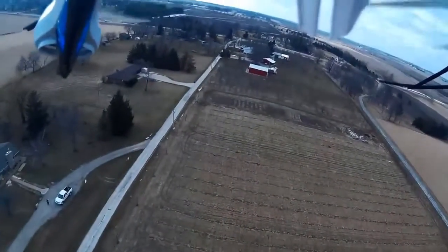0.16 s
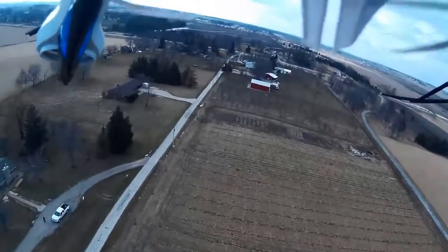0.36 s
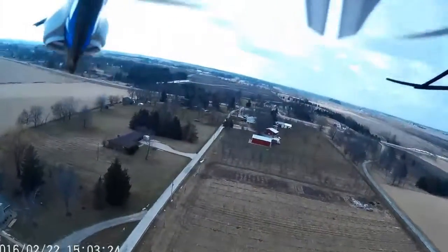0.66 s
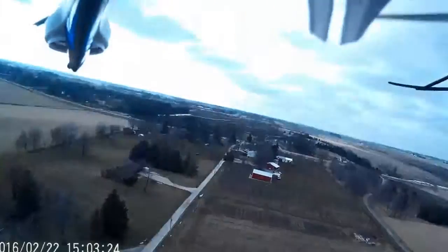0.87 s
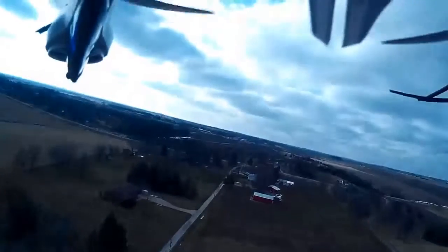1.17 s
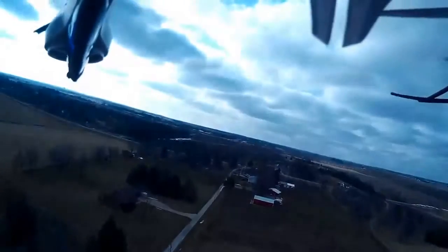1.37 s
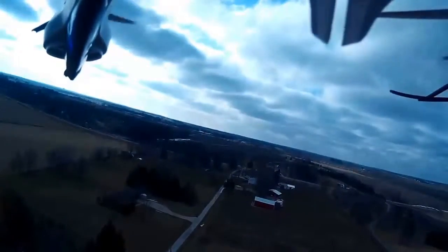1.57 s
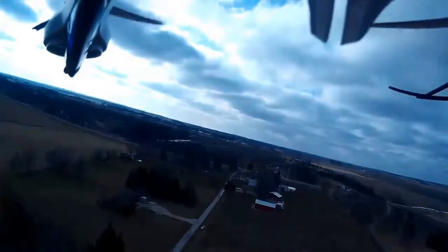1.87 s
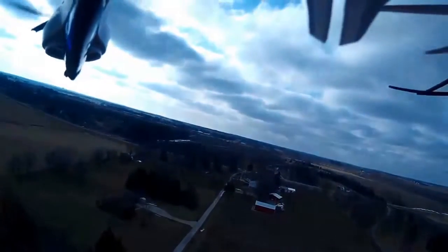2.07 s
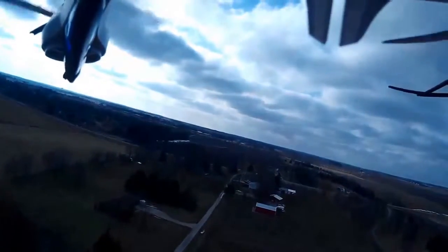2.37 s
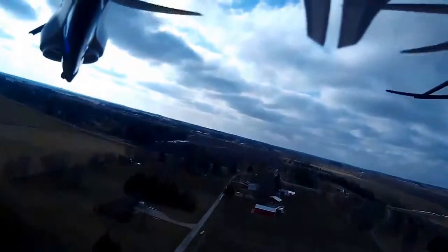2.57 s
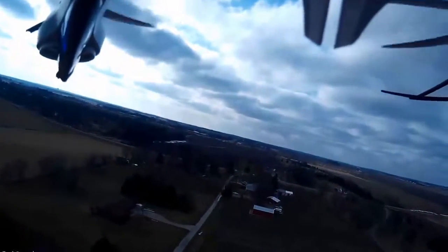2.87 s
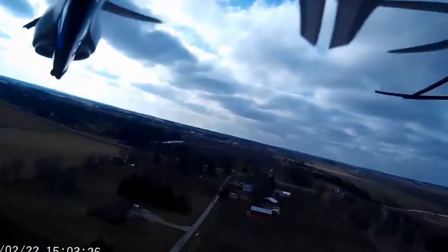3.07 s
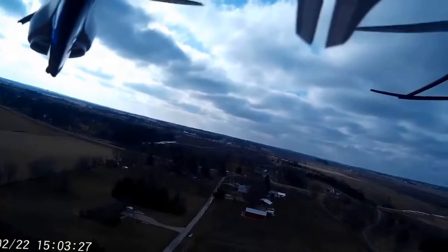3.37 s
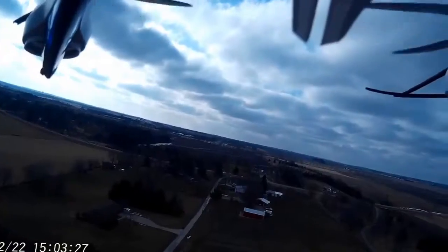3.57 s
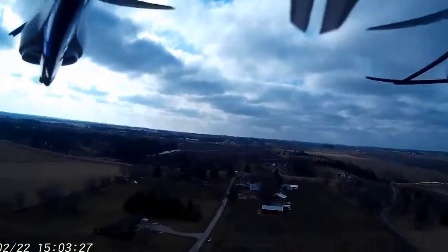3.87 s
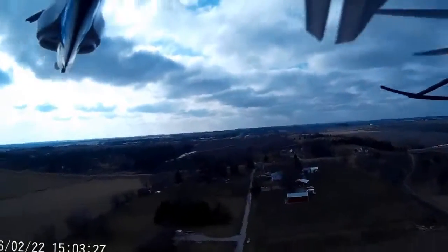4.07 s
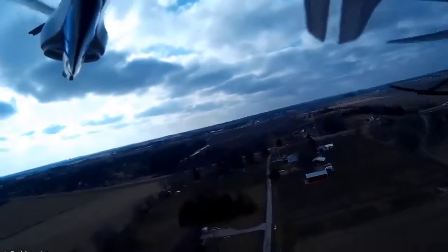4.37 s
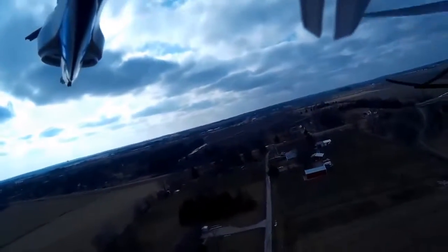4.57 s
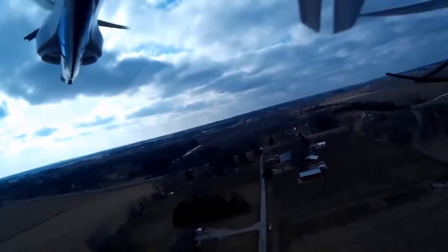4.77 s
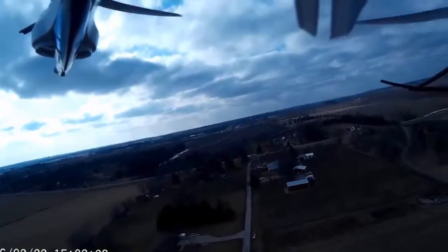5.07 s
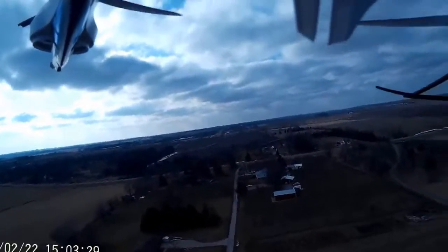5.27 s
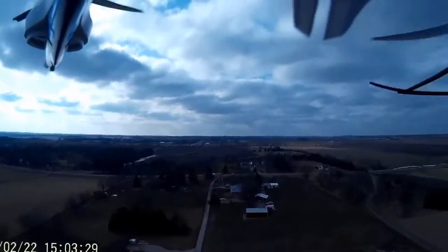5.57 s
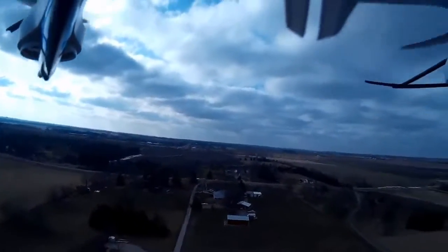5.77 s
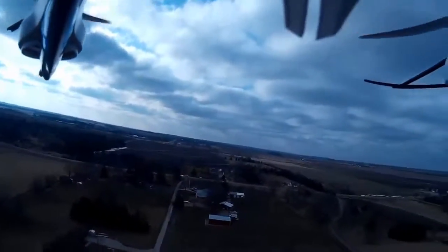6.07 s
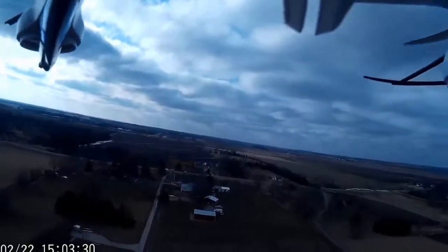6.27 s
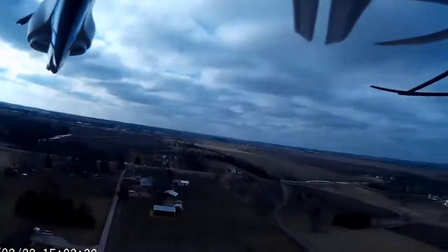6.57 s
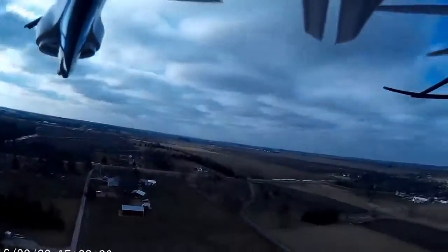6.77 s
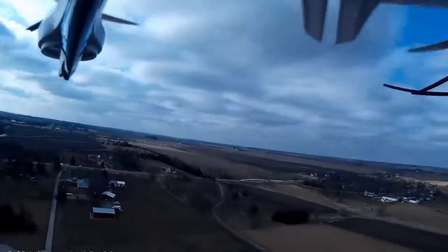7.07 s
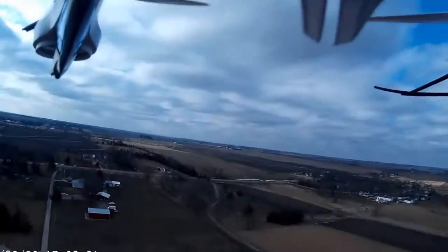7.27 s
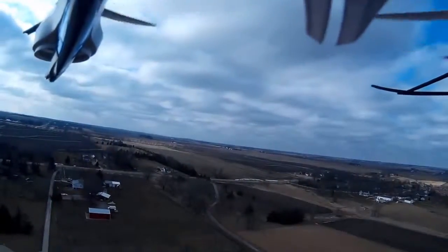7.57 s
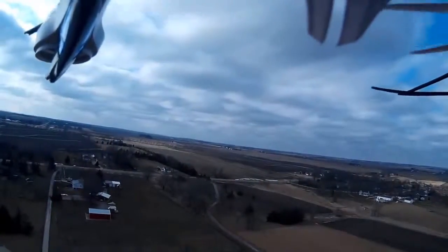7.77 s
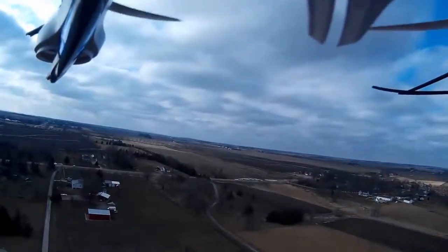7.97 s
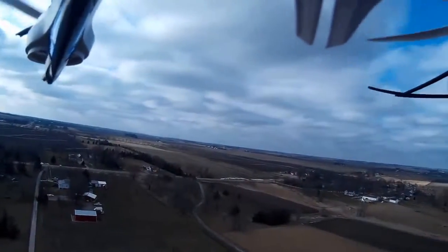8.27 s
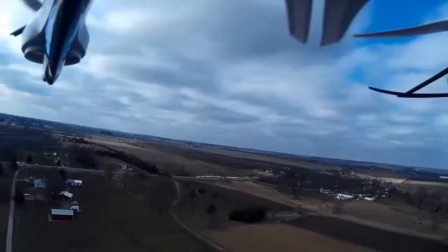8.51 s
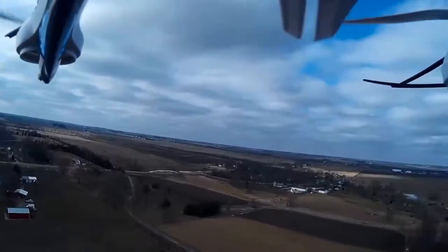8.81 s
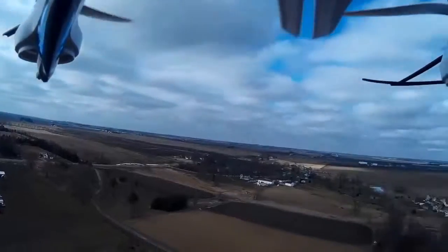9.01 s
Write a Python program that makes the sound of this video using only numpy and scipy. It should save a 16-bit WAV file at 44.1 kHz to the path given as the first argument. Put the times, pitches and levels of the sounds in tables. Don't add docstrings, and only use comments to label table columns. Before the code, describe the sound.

A small quadcopter is already flying, heard dry and very close through a microphone on its plastic frame. From 0 s four brushed motors make a dense, nasal whine, mostly in the mid range, each pitch wavering separately so they beat and clash. Beneath is low two-blade propeller hum; above are gear whine, gritty hiss and soft, irregular rattling. Wind buffets in low lumps until about 2 s, eases by 3 to 4 s, and leaves the motors clearer as their pitches keep sliding. A short gust thumps near 6 s. From about 6.5 s the motor pairs trade speed: quick pitch steps at 6.5, 7 and 7.2 s, then another drop near 8.1 s. Propeller rush swells and dips. A thin, fixed high electronic tone grows faintly towards the end around 9 s, with the motors still running.

```python
import sys
import numpy as np
from scipy import signal
from scipy.fft import rfft, irfft
from scipy.io import wavfile

SR = 44100
rng = np.random.default_rng(int(sys.argv[2]) if len(sys.argv) > 2 else 0)


def nominal_scale(level):
    x = np.asarray(level, float) / 20
    return 10 ** x


def output_pcm(signal):
    pcm = np.clip(np.atleast_2d(signal).T, -1, 1) * 32767
    wavfile.write(sys.argv[1], SR, np.round(pcm).astype(np.int16))


N = 403206
HOP = 40


def rms_one(x):
    return x / np.sqrt(np.mean(x ** 2) + 1e-20)


def in_time(rows):
    s, *columns = np.transpose(rows)
    return [np.interp(np.arange(N) / SR, s, column) for column in columns]


def at_hz(points, hz):
    points = np.array(points)
    return np.interp(np.log(hz), np.log(points[:, 0]), points[:, 1])


def slow_chance(rate):
    r = np.exp(-2 * HOP * np.pi * rate / SR)
    settle = 2000
    noise = rng.standard_normal(N // HOP + settle + 2)
    return rms_one(signal.lfilter([1], [1, -2 * r, r * r], noise)[settle:])


def to_samples(slow):
    return np.interp(np.arange(N) / HOP, np.arange(len(slow)), slow)


def drift(rate):
    return to_samples(slow_chance(rate))


def coloured_noise(points, band):
    hz = np.arange(N // 2 + 1) * SR / N + 1e-3
    gain = nominal_scale(at_hz(points, hz))
    counted = gain[(hz > band[0]) & (hz < band[1])]
    noise = irfft(rfft(rng.standard_normal(N)) * gain, N)
    return noise / np.sqrt(np.sum(counted ** 2) / len(hz))


def tone(turns, order, level_db, flicker_db):
    start = rng.random()
    gain = nominal_scale(level_db + flicker_db * slow_chance(3.6)[:len(level_db)])
    return np.sqrt(2) * to_samples(gain) * np.sin(2 * np.pi * (order * turns + start))


# t/s, shaft speed f/Hz, shaft wobble level/dB, brush whine level/dB
MOTOR_1 = [(0, 767.7, -25, -25.5), (.5, 753, -24, -26.5), (.93, 800, -20.5, -25), (1.29, 773, -22.5, -25),
           (1.83, 748.5, -26, -24), (2.11, 760, -20.5, -21.5), (2.31, 729.8, -26.5, -25),
           (5.7, 731.3, -26.5, -24.5), (5.86, 749.6, -24, -25.5), (6.18, 754.6, -22.5, -23),
           (6.42, 728.6, -24, -24), (6.54, 727, -25, -23), (6.8, 670.6, -25, -25), (7.4, 668, -28, -25),
           (7.72, 691.6, -21.5, -22.5), (8.12, 648.2, -24, -21.5), (8.6, 598.7, -22, -24),
           (9.15, 588.5, -32, -25)]
MOTOR_2 = [(0, 696, -26, -30), (.22, 739, -25, -29.5), (.9, 739.2, -31.5, -36), (1.4, 722, -24, -28),
           (1.86, 716.7, -22, -27), (2.66, 690.8, -20.5, -26.5), (3.6, 684.2, -21.5, -29),
           (3.75, 663, -21, -25), (4.87, 666.3, -20, -24), (5.3, 649.3, -20.5, -23), (5.88, 612, -21, -21),
           (6.19, 613.6, -19.5, -23.5), (6.7, 624, -27.5, -18), (6.99, 668, -18.5, -23),
           (7.81, 668.7, -21, -20), (8.1, 655, -20.5, -18.5), (8.561, 655.8, -39, -19.5),
           (9.15, 617, -27, -16.5)]
MOTOR_3 = [(0, 592.6, -30.5, -27.5), (.87, 610.3, -30.5, -27.5), (1.34, 640.8, -30, -26.5),
           (1.9, 672.5, -27.5, -29), (2.14, 657, -29.5, -29), (2.41, 660, -27, -24),
           (2.7, 688.5, -27, -25.5), (3.36, 719.3, -32, -26.5), (3.62, 720, -25, -28),
           (4.22, 772, -37, -29), (4.6, 739.7, -37, -40), (4.8, 689.2, -37.5, -28.5), (5.45, 644, -29, -22),
           (5.65, 612, -26, -24), (6.57, 660, -28.5, -25), (7.0, 603, -31, -23.5), (7.69, 659.7, -33, -25),
           (9.15, 593.2, -25.5, -21.5)]
MOTOR_4 = [(0, 597, -34, -33), (.59, 567, -26, -30), (.81, 529, -43, -48), (2.06, 530, -34, -27),
           (2.26, 567, -27.5, -33), (2.89, 559, -31.5, -29), (3.26, 523, -34, -27), (3.48, 544, -31, -29.5),
           (3.89, 547, -30.5, -31), (4.21, 505, -47, -27), (4.51, 534, -40, -30), (4.771, 581, -29, -32.5),
           (5.27, 599, -26.5, -41), (6.25, 597, -25.5, -46), (6.62, 568, -27, -19.5),
           (7.1, 613, -30, -28.5), (8.6, 608, -25, -33.5), (9.15, 570, -23, -27)]
MOTORS = [MOTOR_1, MOTOR_2, MOTOR_3, MOTOR_4]
# start t/s, length t/s, lasting step of motors 1 and 3 f/Hz, of motors 2 and 4 f/Hz
YAW = [
    (6.45, .14, 15, -60),
    (7.0, .08, -45, 55),
    (7.19, .2, 58, -52),
    (8.11, .18, 9, -59),
]
# middle t/s, step f/Hz, half length t/s
TRIMS = [
    [(.2, -7, 0.13), (.37, 8, 0.1), (.73, -11, .11), (1.44, 8, .14), (2.07, 6, 0.0997), (3.19, 15, .3),
     (3.55, -14, .22), (4.01, 27, 0.28), (4.62, 17, .26), (5.12, 15, .23), (6.04, -8, 0.16),
     (8.27, 10, .15)],
    [(.49, -10, .25), (2.46, 11, 0.19), (3.1, -11, 0.23), (3.97, -14, .18), (4.62, -22, .24),
     (5.43, -10, 0.12), (5.68, 8, 0.16), (6.36, 14, .17), (8.72, -7, .13), (8.95, 7, .11)],
    [(.46, 22, 0.28), (5.72, 12, 0.0976), (5.95, -16, .17), (8.9, -17, 0.24)],
    [(7.12, 15, .11), (7.47, -12, .14), (7.7, 8, .3), (8.9, 9, .2)],
]


def speed(arm):
    s = np.arange(N) / SR
    hz = in_time(MOTORS[arm])[0]
    for start, length, *pairs in YAW:
        hz = hz + pairs[arm % 2] * np.clip((s - start) / length, 0, 1)
    for middle, step, half in TRIMS[arm]:
        hz = hz + step * np.clip(1 - abs(s - middle) / half, 0, 1)
    return hz


# f/Hz, level/dB
SHELL = [(420, -15.5), (690, 0.5), (1000, -16), (1250, -5), (1600, -11), (1950, -15), (2300, -10),
         (2650, -20), (3150, -28.5), (3800, -22.5), (4600, -26.5), (6300, -39), (7200, -35.5), (9000, -48)]
# f/Hz, width f/Hz, level/dB
FRAME = [
    (668, 24, 3.5),
    (1483, 27, 6),
    (1880, 27, 1),
    (2683.4, 50, 6),
]


def body_db(hz):
    return at_hz(SHELL, hz) + sum(db / (1 + ((hz - top) / width) ** 2) for top, width, db in FRAME)


PROPELLER_TURNS = .09165
# propeller orders away, level/dB
RUN_OUT = [(-1, -25), (1, -14.5), (2, -15)]


def shaft_tone(turns, level_db):
    out = tone(turns, 1, level_db, flicker_db=.8)
    for away, db in RUN_OUT:
        out += tone(turns, 1 + round(away) * PROPELLER_TURNS, level_db + db, flicker_db=-0.5)
    return out


WHINE_ORDERS = [3, 2, 4, 5, 6]
# whine orders 2, 4, 5, 6 re the third level/dB, then mesh orders 7, 8, 10, 12 re the ninth level/dB
WHINE_DB = [
    [-6, -13.5, -5.5, -1, -13, -5.5, -8, -6],
    [-5, -6, -10, -14.5, -4.5, 0, -0.5, -7],
    [-5, -14.5, -7, -2, -6.5, -5, -14, -6],
    [-6.5, -1, -15, -7.5, -10, -8.5, -6, -11],
]


def brush_whine(arm, turns, hz, level_db):
    out = 0
    for order, db in zip(WHINE_ORDERS, [0] + list(WHINE_DB[arm][:4])):
        out = out + tone(turns, order, level_db + db + body_db(order * hz), flicker_db=1.2)
    return out


MESH_ORDERS = [9, 7, 8, 10, 12]
# propeller orders away, level/dB
MESH_SIDES = [(2, -3), (-2, -9)]
# f/Hz, level/dB
GEAR_CASE = [(4400, -5), (4750, -6), (5050, 4), (5350, 0), (6100, 3), (6550, -1), (6900, 1), (7200, 0)]
MESH_DB = [-33, -37, -27.5, -24.5]
# growth of mesh level with speed, dB/Hz
MESH_DB_PER_HZ = [.3, 0, .04, 0]
# growth of mesh level as gears warm, dB/s
MESH_DB_PER_S = [-.5, .8, .5, .5]
MESH_SWING_DB = [0, -12, -14, -14]


def gear_mesh(arm, turns, hz, load_db):
    from_middle_s = (np.arange(0, N, HOP) - N / 2) / SR
    by_speed = np.clip(MESH_DB_PER_HZ[arm] * (hz - hz.mean()), -7, 7)
    level_db = MESH_DB[arm] + MESH_DB_PER_S[arm] * from_middle_s + by_speed + load_db
    level_db = level_db + at_hz(GEAR_CASE, 9 * hz)
    out = 0
    for order, db in zip(MESH_ORDERS, [0] + list(WHINE_DB[arm][4:])):
        out = out + tone(turns, order, level_db + db + body_db(order * hz), flicker_db=1.6)
    for away, db in MESH_SIDES:
        side_db = level_db + MESH_SWING_DB[arm] + db + body_db(9 * hz)
        out += tone(turns, 9 + round(away) * PROPELLER_TURNS, side_db, flicker_db=4)
    return out


# propeller order, level/dB re the blade hum
PROPELLER = [(1, -24.5), (2, -0.5), (3, -15), (4, -13.5), (6, -28.5)]


def propeller_hum(turns, level_db):
    out = 0
    for order, db in PROPELLER:
        out = out + tone(turns, round(order) * PROPELLER_TURNS, level_db + db, flicker_db=.5 + 0.43 * order)
    return out


def rotor(arm, hz, blade_db, load_db):
    unsteady = 1 + .0006 * drift(26.1) + .001 * drift(5.0)
    turns = np.cumsum(hz * unsteady) / SR
    shaft_db, whine_db = in_time(MOTORS[arm])[1:]
    hz, shaft_db, whine_db, blade_db, load_db = np.array([hz, shaft_db, whine_db, blade_db, load_db])[:, ::HOP]
    out = shaft_tone(turns, shaft_db + body_db(hz))
    out += brush_whine(arm, turns, hz, whine_db + load_db)
    out += gear_mesh(arm, turns, hz, load_db)
    return out + propeller_hum(turns, blade_db)


# f/Hz, level/dB per Hz
WIND = [(15, -28), (34, 4), (55, 7.5), (100, 0.5), (200, -0.5), (320, -11.5), (600, -56.5), (1500, -88)]


def wind(level_db):
    return nominal_scale(level_db + 1.14 * drift(6.5)) * coloured_noise(WIND, (20, 75))


# f/Hz, level/dB per Hz
DOWNWASH = [(90, -18.5), (200, -2.5), (420, -4.5), (690, 0.5), (1000, 0), (1850, -9), (2300, -8.5),
            (3150, -27), (6000, -64)]


def downwash(level_db):
    return nominal_scale(level_db + 0.37 * drift(11.0)) * coloured_noise(DOWNWASH, (850, 1150))


# f/Hz, level/dB per Hz
HISS = [(2000, 1), (3150, 11.5), (3900, 22), (4700, 17), (6300, 4), (7200, 9), (9000, -2), (11500, 3),
        (12800, -10.5), (15500, -15.5)]


def hiss(level_db, hz):
    blades = 2 * PROPELLER_TURNS * np.cumsum(hz) / SR
    throb_db = np.sin(2 * np.pi * blades)
    return nominal_scale(level_db + 0.43 * drift(25) + throb_db) * coloured_noise(HISS, (7500, 12000))


# f/Hz, width f/Hz, level/dB
RATTLE = [
    (3680, 270, -1),
    (4430, 240, 2),
    (4970, 2200, -15),
]


def rattle(level_db):
    per_s, spread_db, soft_hz = 110, 5, 5500
    born = rng.random(N) < per_s * nominal_scale(7.0 * drift(14)) / SR
    strength = nominal_scale(spread_db * np.minimum(rng.exponential(1, N), 3))
    ticks = born * strength * rng.choice([-1, 1], N) + 1e-18
    ticks = signal.sosfilt(signal.butter(6, soft_hz, fs=SR, output="sos"), ticks)
    out = 0
    for k, (hz, width, db) in enumerate(RATTLE):
        r = np.exp(-np.pi * width / SR)
        poles = [1, -2 * r * np.cos(2 * np.pi * hz / SR), r * r]
        out = out + (-1) ** k * nominal_scale(db) * signal.lfilter([1 - r, 0, r - 1], poles, ticks)
    ringing = signal.sosfilt(signal.butter(3, 2800, "high", fs=SR, output="sos"), out)
    return nominal_scale(level_db - 10.5) * rms_one(ringing)


def switching():
    s = np.arange(N) / SR
    return tone(3670.2 * s, 1, level_db=-54.5 + 0.93 * s[::HOP], flicker_db=2.0)


# t/s, wind on the port level/dB, downwash level/dB, blade hum of the nearest propeller level/dB
AIR = [(0, -28, -33, -26), (.38, -25.5, -29.5, -19.5), (1.35, -26, -30.5, -22), (1.95, -28, -30, -21),
       (2.47, -32, -30, -21.5), (2.77, -30.5, -33, -25.5), (3.59, -35, -33, -28.5),
       (4.1, -38.5, -33.5, -26), (5.01, -37.5, -34, -27), (5.88, -38.5, -31, -22.5),
       (5.97, -28.5, -32, -22.5), (6.1, -37, -30, -24), (6.69, -37.5, -31, -23), (7.05, -38.5, -29, -25),
       (7.22, -42.5, -34.5, -28.5), (7.55, -38, -30.5, -21.5), (8.35, -40, -29.5, -30),
       (9.14, -43, -27.5, -22)]
# level/dB in mean wind, share of the wind's swing
FAR_BLADES = [
    (-32, 0.72),
    (-35.5, 0.092),
    (-34, 0.56),
]


def scene():
    wind_db, downwash_db, near_db = in_time(AIR)
    gust = wind_db - wind_db.mean()
    load = downwash_db - downwash_db.mean()
    blades = [near_db] + [db + share * gust for db, share in FAR_BLADES]
    speeds = [speed(arm) for arm in range(4)]
    out = sum(rotor(arm, speeds[arm], blades[arm], 0.69 * load) for arm in range(4))
    out = out + wind(wind_db) + downwash(downwash_db)
    out += hiss(-57 + 0.77 * load, speeds[0])
    out += rattle(-39.5 + 0.34 * gust + 1.5 * load)
    return (out + switching())[None]


def roll_off(x):
    return signal.sosfilt(signal.butter(12, 15710, fs=SR, output="sos"), x)


def record(dry):
    return roll_off(dry)


dry = scene()
out = record(dry)
output_pcm(out)
```